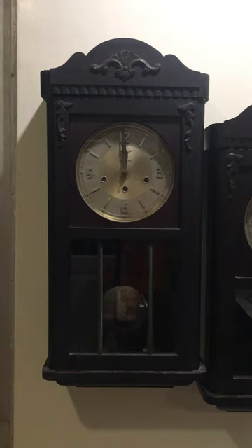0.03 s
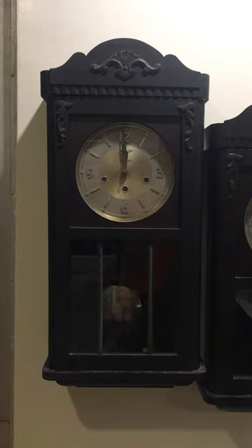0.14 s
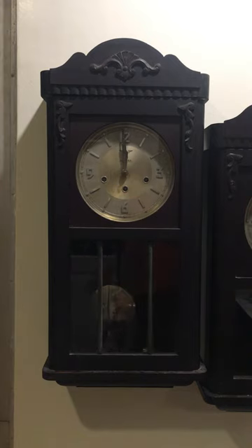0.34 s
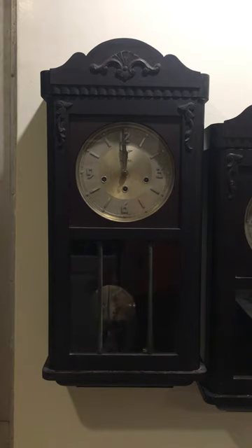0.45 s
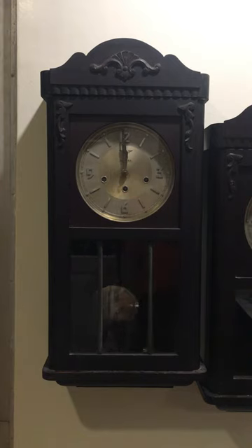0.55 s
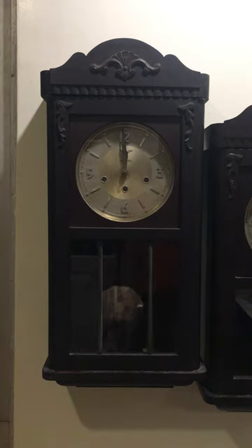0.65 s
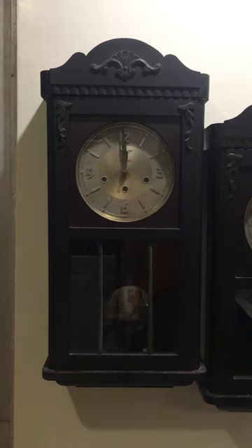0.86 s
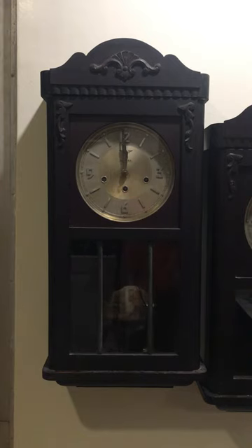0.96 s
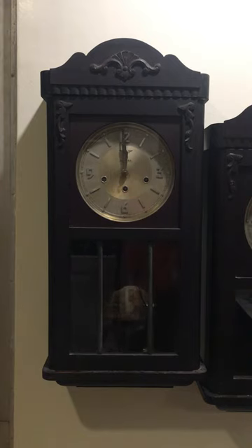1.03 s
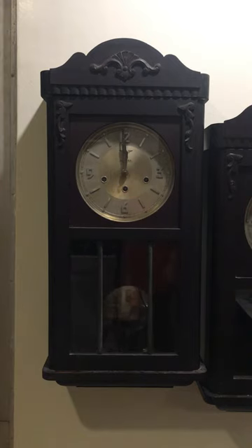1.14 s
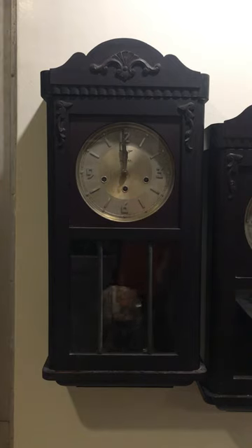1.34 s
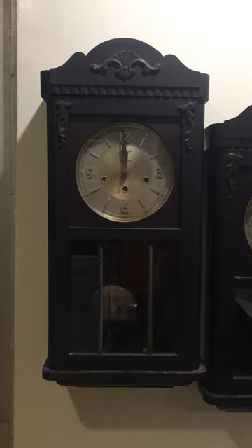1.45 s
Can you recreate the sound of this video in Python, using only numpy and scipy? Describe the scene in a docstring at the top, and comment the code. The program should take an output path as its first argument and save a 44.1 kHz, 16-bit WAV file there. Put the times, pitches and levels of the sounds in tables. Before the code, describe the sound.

A wooden wall clock prepares to strike in a quiet room, heard close with a faint short echo. A crisp tick at 0.16 seconds leads into a loud, uneven brass-and-wood clatter from 0.22 to 0.43, thumping the case. Low hum and faint metallic shimmer decay. A soft gear rattle quickens into a fluttering whirr, growing by 1.1, with a more ringing tick at 0.8 and a brighter one at 1.36.

```python
"""A tick, then a loud wooden and brassy clatter, a case thump, a low hum and a whirr that speeds up.
A wooden wall clock in a quiet room gets ready to strike, heard with only a faint, short echo.
Ticks and lever blows are bursts of shaped noise plus damped modes; the gong rods are long modes.
The freed gear train is tooth-modulated noise with narrow whines and a low drone, over room tone."""
import sys
import numpy as np
from scipy import signal
from scipy.fft import rfft, irfft, next_fast_len
from scipy.io import wavfile

SR = 44100
rng = np.random.default_rng(int(sys.argv[2]) if len(sys.argv) > 2 else 0)


def output_pcm(signal):
    """Save a mono or channel-first signal as 16-bit PCM at the path in sys.argv[1].

    Samples are clipped to [-1, 1] before scaling.
    """
    pcm = np.clip(np.atleast_2d(signal).T, -1, 1) * 32767
    wavfile.write(sys.argv[1], SR, np.round(pcm).astype(np.int16))


N = 66150  # samples, 1.5 s


def amp(db):
    """Decibels to gain."""
    return 10 ** (np.asarray(db) / 20)


def unit(x):
    """x at rms 1."""
    return x / np.sqrt(np.mean(x ** 2) + 1e-20)


def since(start_s):
    """Seconds since start_s, zero before it."""
    return np.maximum(np.arange(N) / SR - start_s, 0)


def filtered(x, gain):
    """x times a gain that depends on frequency."""
    size = next_fast_len(N + 8192)  # zero padding keeps the end from wrapping onto the start
    spectrum = rfft(x, size) * gain(np.fft.rfftfreq(size, 1 / SR))
    return irfft(spectrum, size)[:N]


def noise(colour):
    """Noise of rms 1 whose spectrum joins the points of a colour table."""
    point_hz, point_db = np.transpose(colour)

    def gain(hz):
        return amp(np.interp(np.log(hz + 1), np.log(point_hz), point_db))

    return unit(filtered(rng.standard_normal(N), gain))


def narrow(pitch_hz, width_hz):
    """A resonance kept ringing by friction, rms 1."""
    def gain(hz):
        return 1 / (1 + ((hz - pitch_hz) / width_hz) ** 2)

    return unit(filtered(rng.standard_normal(N), gain))


ATTACK_S = 0.00087  # rise time constant


def burst(start_s, colour, hold_s, t60_s):
    """Dense ringing after a blow: quick rise, short hold, exponential decay."""
    t = since(start_s)
    rise = 1 - np.exp(-t / ATTACK_S)
    decay = amp(-60 * np.maximum(t - hold_s, 0) / t60_s)
    return noise(colour) * rise * decay


def ring(start_s, modes, rise_s, scatter_db):
    """Damped modes struck together, each level scattered at random by scatter_db."""
    t = since(start_s)
    out = np.zeros(N)
    for pitch_hz, level_db, t60_s in modes:
        decay = amp(level_db + scatter_db * rng.standard_normal() - 60 * t / t60_s)
        out += decay * np.sin(2 * np.pi * pitch_hz * t)
    return (1 - np.exp(-t / rise_s)) * out


# colour of the quiet room: pitch_hz, level_db
ROOM_COLOUR = [(25, -18), (50, -29), (82, 20), (115, -23), (150, 5.5), (220, -17), (310, -2.5), (420, -21),
               (1000, -24), (4000, -29.5), (16000, -30)]
ROOM_TONE_DB = -57


def room_tone():
    """The steady tone of the quiet room, as shaped noise."""
    return amp(ROOM_TONE_DB) * noise(ROOM_COLOUR)


# escapement beats: start_s, knock_db (case), wood_db, brass_db, ring_db (pallet), hold_s
TICKS = [(0.156, -40, -31, -27, -45, 0.0088), (.7966, -49.5, -33, -35.5, -30.5, 0.015),
         (1.359, -40, -31, -28, -44.5, 0.0058)]
# colour of a knock in the case panels, for ticks and lever blows: pitch_hz, level_db
KNOCK = [(40, -23), (80, 6), (115, 2.5), (160, 4), (210, -5.5), (275, 4.5), (390, -13), (460, -4.5),
         (520, -6), (600, -1), (680, -15.5), (780, -2), (890, -25), (2000, -38)]
# colour of a tick in the wooden board: pitch_hz, level_db
TICK_WOOD = [(500, -25), (900, -12.5), (1080, -8.5), (1350, -12), (1900, 6.5), (2200, -5), (2620, 9.5),
             (3050, -4), (3500, 5.5), (4200, -8.5), (4900, 0), (7000, -7), (11000, -11), (16000, -29)]
# colour of a tick in the brass works: pitch_hz, level_db
TICK_BRASS = [(2500, -8.5), (5500, -13), (8000, 1), (9100, 4), (10000, 3), (11000, 6), (12200, -19),
              (16000, -15)]
# modes of a struck pallet: pitch_hz, level_db, t60_s
PALLET = [(1750, -0.5, .11), (2596, -16, 0.03), (3790, -5.5, 0.098), (4300, -1.5, 0.081), (4721, 4, 0.051),
          (5749, -4.5, .09), (9372, 0, 0.046)]
KNOCK_T60, TICK_WOOD_T60, TICK_BRASS_T60 = 0.2, 0.083, 0.055  # s
SNAP_DB, SNAP_T60 = 2.5, 0.012  # first contact of a pallet: dB re its brass level, s


def escapement():
    """The two pallets catch the wheel in turn, one brighter, one more ringing."""
    out = np.zeros(N)
    for start_s, knock_db, wood_db, brass_db, ring_db, hold_s in TICKS:
        out += amp(knock_db) * burst(start_s, KNOCK, hold_s, KNOCK_T60)
        out += amp(wood_db) * burst(start_s, TICK_WOOD, hold_s, TICK_WOOD_T60)
        brass = burst(start_s, TICK_BRASS, 0, TICK_BRASS_T60)
        snap = amp(SNAP_DB) * burst(start_s, TICK_BRASS, 0.00071, SNAP_T60)
        out += amp(brass_db) * (brass + snap)
        out += amp(ring_db) * ring(start_s, PALLET, rise_s=0.0025, scatter_db=0)
    return out


# lever blows: start_s, knock_db (case), wood_db, brass_db, thump_db (case), hold_s
BLOWS = [(0.2235, -24.5, -28.5, -14, -23.5, 0.0039), (0.2363, -15.5, -21, -12, -10, 0.0052),
         (0.2556, -32.5, -30, -22, -17, 0.0035), (0.2755, -27.5, -32, -23, -42, 0.0006),
         (0.2837, -34, -38, -22, -19.5, 0.00075), (0.2927, -20.5, -11.5, -7.5, -10.5, 0.0047),
         (.3268, -59, -32.5, -26, -20.5, 0.0014), (0.3447, -40.5, -40, -40.5, -21.5, .003),
         (.3700, -27.5, -17, -19, -15, 0.003), (0.4158, -29, -27, -29.5, -26.5, 0.0056),
         (0.432, -39, -34, -35, -70, 0.0025)]
# colour of a blow in the wooden board: pitch_hz, level_db
WOOD = [(400, -18), (760, -28), (890, -12.5), (1050, -8.5), (1350, -6), (1750, 2.5), (2200, -7.5),
        (2600, -3.5), (3600, 1.5), (5000, -7), (7000, -10), (16000, -58)]
# colour of a blow in the brass works: pitch_hz, level_db
BRASS = [(1500, -29), (3500, -14.5), (5000, -0.5), (6800, -4), (7700, 6), (8500, -1), (10500, 1.5),
         (12000, -4), (14000, -5), (16000, -12.5)]
# short modes of the movement on its board: pitch_hz, level_db, t60_s
WORKS = [(1733, -18, 0.077), (1920, -5, 0.051), (2535, -9.5, 0.093), (2914, -10.5, 0.079),
         (3486, -12.5, 0.098), (4910, -7, 0.048), (5780, -8.5, 0.064), (7160, -4.5, .06), (7180, -22, .05),
         (9190, -0.5, 0.059)]
# quick low modes of the case: pitch_hz, level_db, t60_s
BODY = [(75.9, -2.5, 0.29), (133.63, -5, 0.38), (246.8, -15, 0.15), (264.3, -12, .22), (284.3, -16, 0.17),
        (458, -20.5, 0.37), (585, -27, 0.21), (589.4, -18, 0.12)]
WOOD_T60, BRASS_T60 = 0.082, 0.051  # s
CRACK_DB = -1  # first contact of a lever, re its brass level


def levers():
    """Each blow cracks in the brass, knocks the wood and shakes the case."""
    out = np.zeros(N)
    for start_s, knock_db, wood_db, brass_db, thump_db, hold_s in BLOWS:
        out += amp(knock_db) * burst(start_s, KNOCK, hold_s, KNOCK_T60)
        out += amp(wood_db) * burst(start_s, WOOD, hold_s, WOOD_T60)
        brass = burst(start_s, BRASS, hold_s, BRASS_T60)
        crack = amp(CRACK_DB) * burst(start_s, BRASS, 0.00088, SNAP_T60)
        out += amp(brass_db) * (brass + crack)
        works_db = (wood_db + brass_db) / 2
        out += amp(works_db) * ring(start_s, WORKS, rise_s=0.0023, scatter_db=0.5)
        out += amp(thump_db) * ring(start_s, BODY, rise_s=0.0022, scatter_db=3.56)
    return out


# modes of the gong rods: pitch_hz, level_db, t60_s
RODS = [(49.5, -18.5, 1.92), (55, -30, .8), (83.5, -15, 1.12), (88, -20, 1.05), (129, -23, .55),
        (156, -31, 1.23), (3005, -39, 0.75), (3176, -36, 0.52), (3345, -46, 0.16), (3420, -42, 0.32),
        (3540, -43, 0.68), (3741, -38.5, 0.71), (4081, -44.5, 0.79)]
# colour of their dense upper partials: pitch_hz, level_db
SHIMMER = [(2600, -35), (2950, 10), (3300, 1), (3650, 0), (4100, -11), (4500, -39)]
SHIMMER_DB, SHIMMER_T60 = -37, 0.48  # dB, s


def gong_rods():
    """The rods hum and shimmer on after the heaviest blow, the one loudest in the wood."""
    heaviest = max(BLOWS, key=lambda blow: blow[2])
    start_s = heaviest[0]
    hum = ring(start_s, RODS, rise_s=0.004, scatter_db=0.7)
    return hum + amp(SHIMMER_DB) * burst(start_s, SHIMMER, 0, SHIMMER_T60)


# run of the gear train: start_s, teeth_per_s, level_db
TRAIN = [(.42, 35, -62), (.52, 45, -65), (0.582, 66, -58), (0.682, 76, -59), (.76, 78, -56),
         (.88, 117, -53), (1.04, 130, -53), (1.12, 140, -47), (1.3, 140, -48), (1.5, 141, -48)]
# colour of meshing teeth: pitch_hz, level_db
MESH = [(900, -28), (1400, -11), (1900, -2), (2200, -19), (2500, -1), (3300, -4.5), (4000, -1.5),
        (4500, -7.5), (5100, -4.5), (6000, -1.5), (7200, -1), (8450, 4.5), (10000, -5), (11500, -2.5),
        (13000, -13.5), (16000, -19)]
# wheels ringing: pitch_hz, level_db (re train), width_hz
WHINE = [(2440, -18, 59), (4050, -10.5, 120), (4540, -13, 89), (8250, -14.5, 37)]
# colour of the train heard through the case: pitch_hz, level_db
DRONE = [(30, -28), (42, 3.5), (50, 18.5), (62, -8.5), (86, 5), (105, 0.5), (150, 1.5), (200, -17.5),
         (300, -5.5), (390, -24.5), (465, -10), (520, -26.5), (595, -7.5), (680, -18.5), (950, -31),
         (1400, -22), (2200, -35.5), (5000, -41.5)]
# thin singing of a pivot: start_s, level_db
PIVOT = [(.45, -75), (.56, -69.5), (.72, -66), (.78, -57), (.83, -71), (1.2, -64), (1.29, -50), (1.38, -58),
         (1.48, -45)]
PIVOT_HZ, PIVOT_WIDTH_HZ = 9500, 33
DRONE_DB, DRONE_FOLLOWS = -39.5, 0.19  # dB; drone dB per dB of train level
TOOTH_T60, TOOTH_SCATTER_DB = 0.069, 1.2  # s, dB
TEETH_PER_TURN, TURN_SWING_DB = 6, 2.4


def gear_train():
    """Tooth clicks speed up into a whirr that swells once a turn and drones through the case."""
    t = since(0)
    times, rates, levels = np.transpose(TRAIN)
    level_db = np.interp(t, times, levels)
    teeth_per_s = np.interp(t, times, rates)
    running = np.clip(since(BLOWS[-3][0]) / 0.1, 0, 1)  # fades in from the third-last blow

    teeth = np.cumsum(teeth_per_s) / SR
    scatter = amp(TOOTH_SCATTER_DB * rng.standard_normal(N))
    clicks = np.diff(np.floor(teeth), prepend=0) * scatter  # one at each whole tooth
    tooth_decay = amp(-60 * t / TOOTH_T60)
    power = np.abs(signal.fftconvolve(clicks ** 2, tooth_decay ** 2)[:N])
    rattle = unit(np.sqrt(power / teeth_per_s))  # more teeth do not make it louder
    swell = amp(TURN_SWING_DB * np.sin(2 * np.pi * teeth / TEETH_PER_TURN))
    mesh = noise(MESH) * rattle * swell

    whine = sum(amp(db) * narrow(pitch_hz, width_hz) for pitch_hz, db, width_hz in WHINE)
    drone_db = DRONE_DB + DRONE_FOLLOWS * (level_db - levels[-2])
    drone = amp(drone_db) * noise(DRONE)
    pivot_db = np.interp(t, *np.transpose(PIVOT))
    pivot = amp(pivot_db) * narrow(PIVOT_HZ, PIVOT_WIDTH_HZ)
    return running * (amp(level_db) * (mesh + whine) + drone + pivot)


ECHO_DB, ECHO_T60 = -35, 0.25  # dB re clock, s


def room_echo(clock):
    """A faint, short echo: the clock convolved with decaying noise."""
    tail = rng.standard_normal(N) * amp(-60 * since(0) / ECHO_T60)
    tail = tail / np.linalg.norm(tail)
    return amp(ECHO_DB) * signal.fftconvolve(clock, tail)[:N]


def scene():
    """The clock, its echo and the room tone, in one channel."""
    clock = escapement() + levers() + gong_rods() + gear_train()
    return (room_tone() + clock + room_echo(clock))[None]


LOW_CUT_HZ, TOP_HZ, EDGE_HZ = 44, 16150, 300  # the top edge slopes to silence over EDGE_HZ
PEAK_LIMIT = 0.9  # amplitude that rounded peaks approach


def record(dry):
    """One microphone channel: deep bass cut, loudest peaks rounded, nothing above the band limit."""
    low_cut = signal.butter(2, LOW_CUT_HZ, "highpass", fs=SR, output="sos")
    x = signal.sosfilt(low_cut, dry[0])
    x = x / (1 + np.abs(x / PEAK_LIMIT) ** 6) ** (1 / 6)
    return filtered(x, lambda hz: np.clip((TOP_HZ - hz) / EDGE_HZ, 0, 1))[None]


dry = scene()
out = record(dry)
output_pcm(out)
```